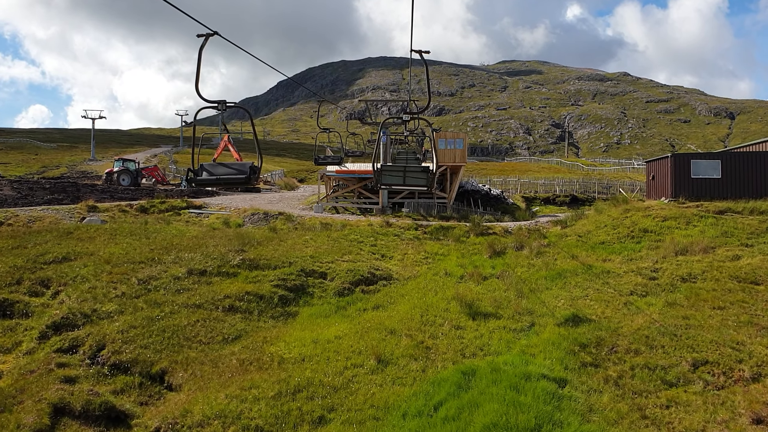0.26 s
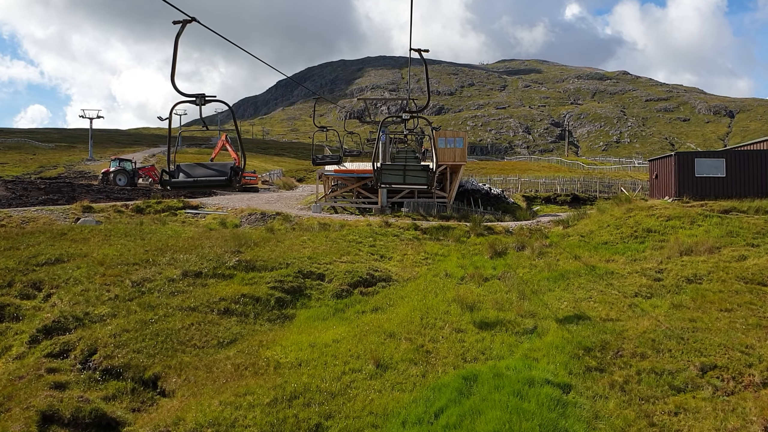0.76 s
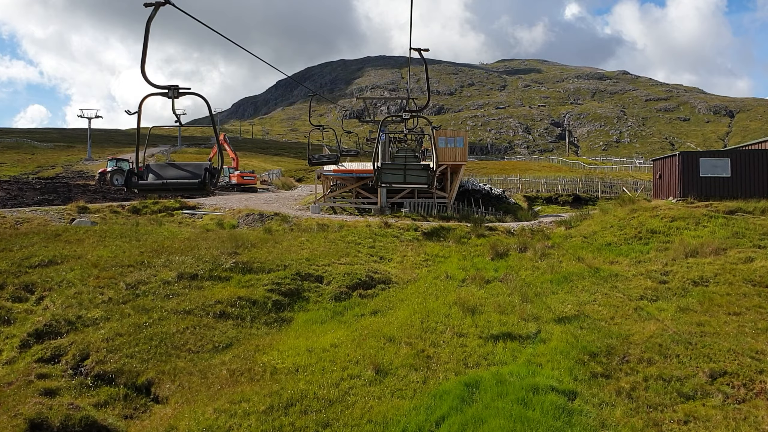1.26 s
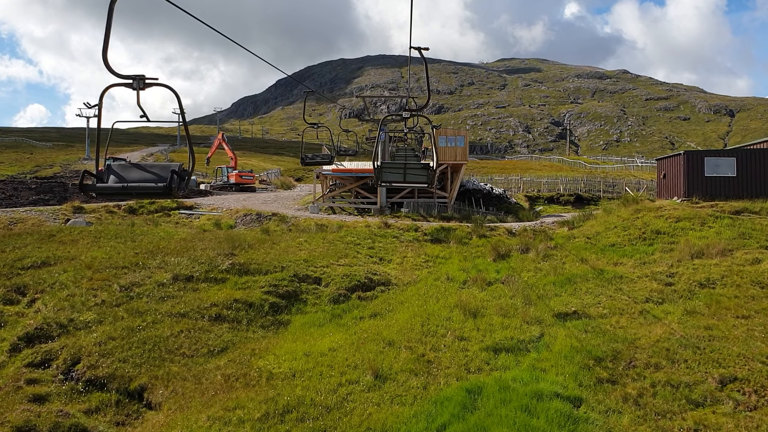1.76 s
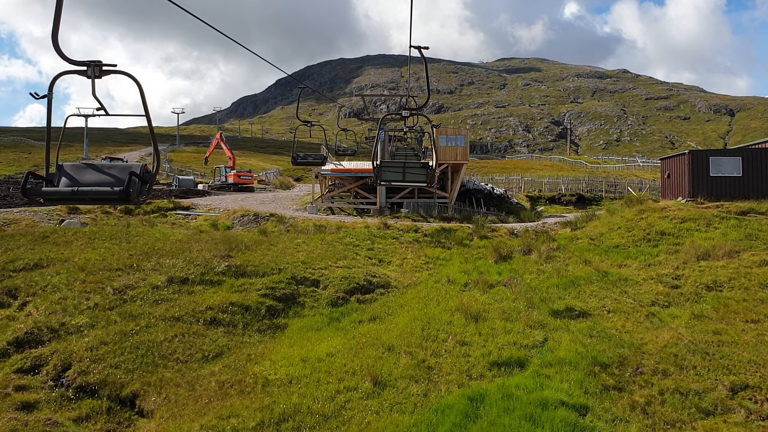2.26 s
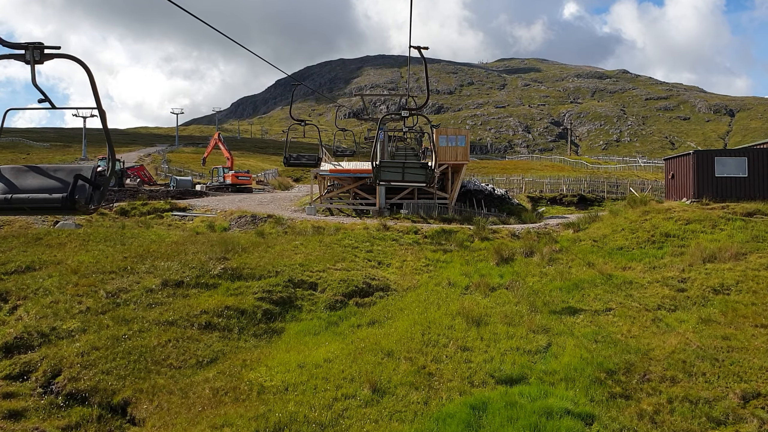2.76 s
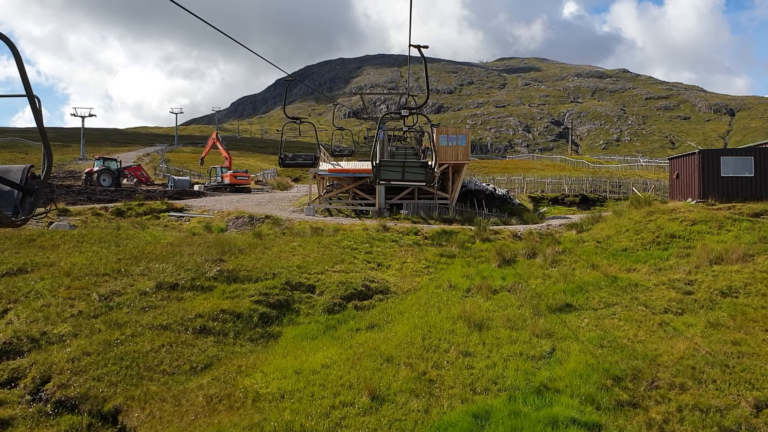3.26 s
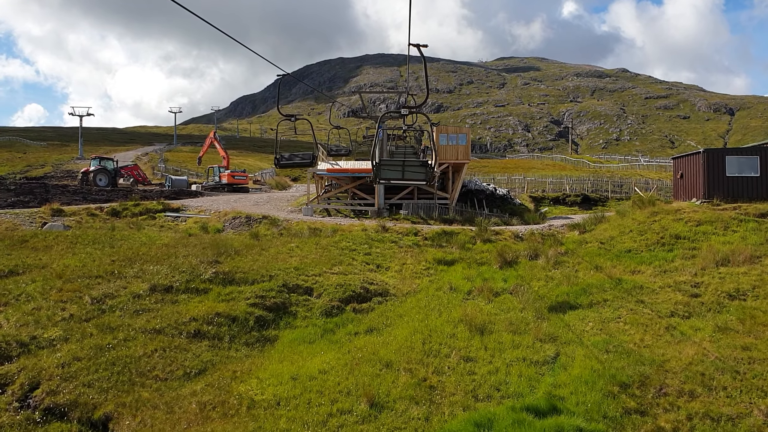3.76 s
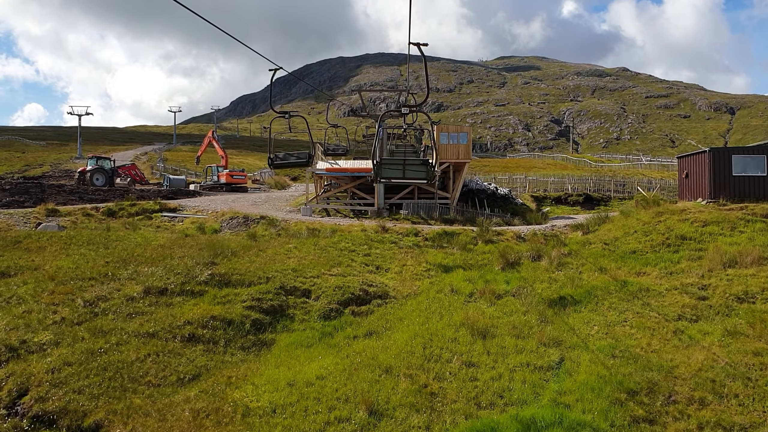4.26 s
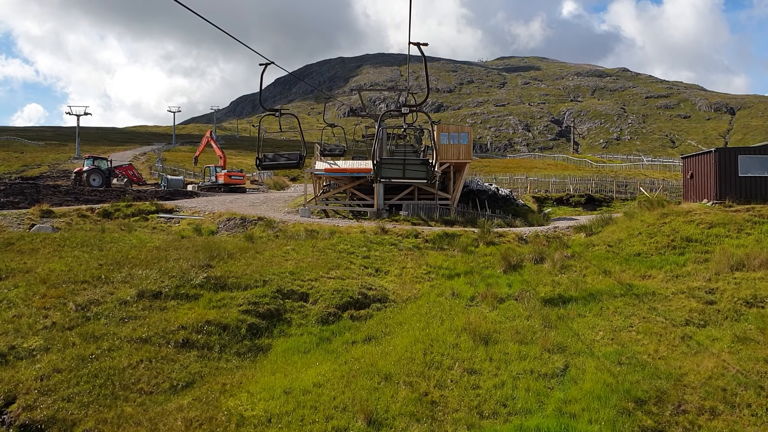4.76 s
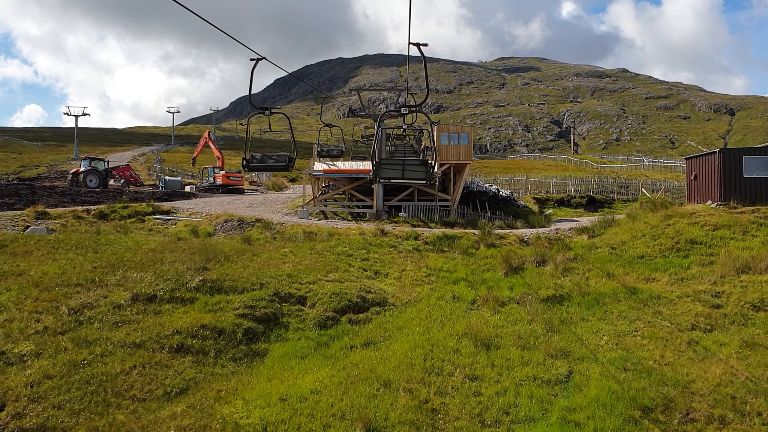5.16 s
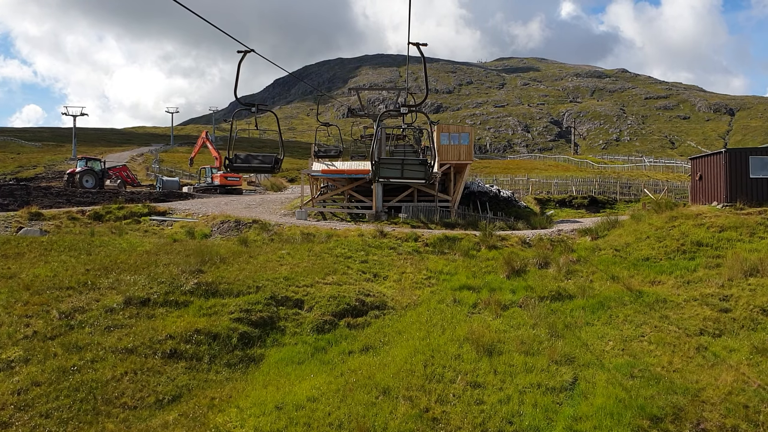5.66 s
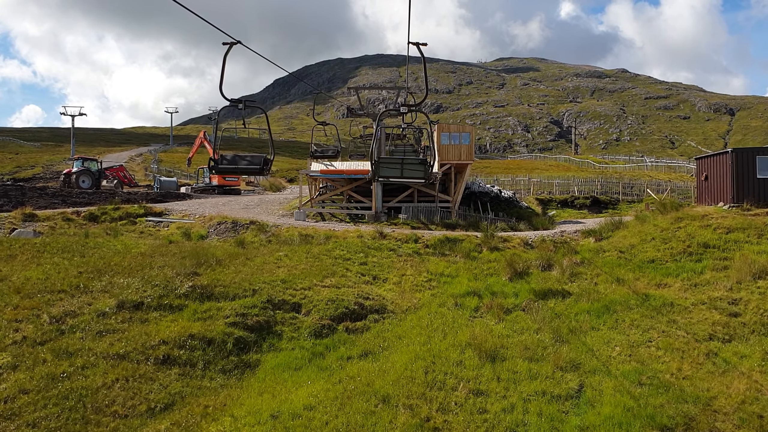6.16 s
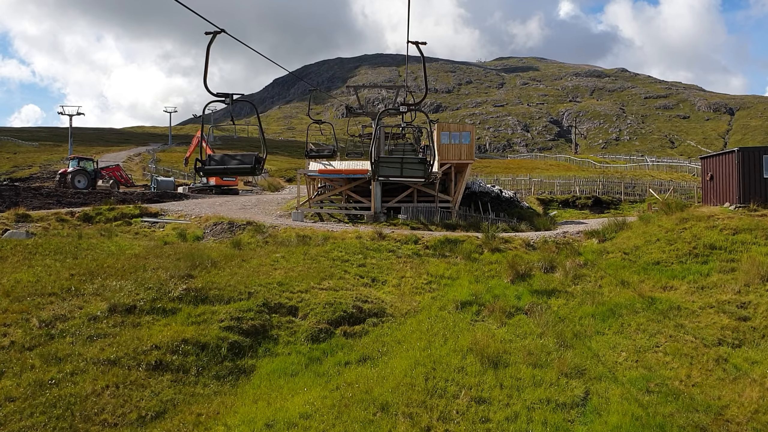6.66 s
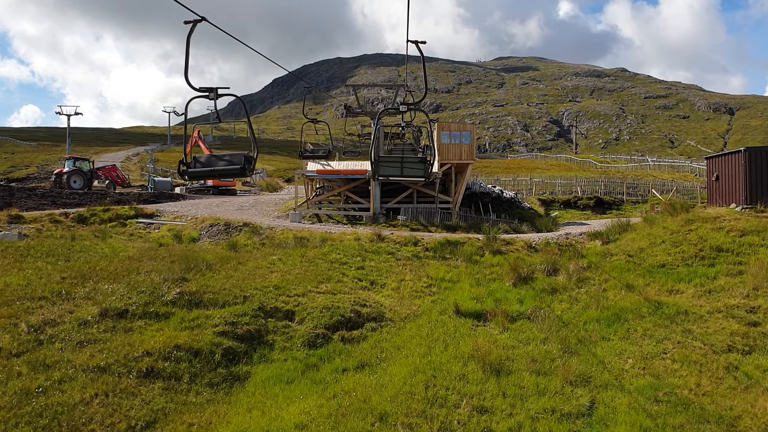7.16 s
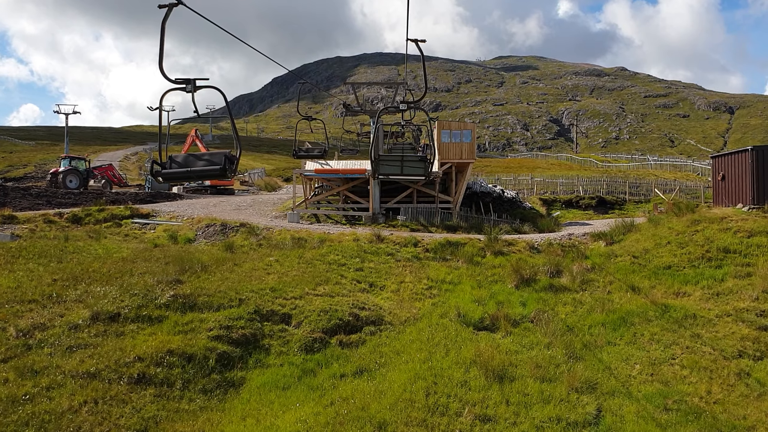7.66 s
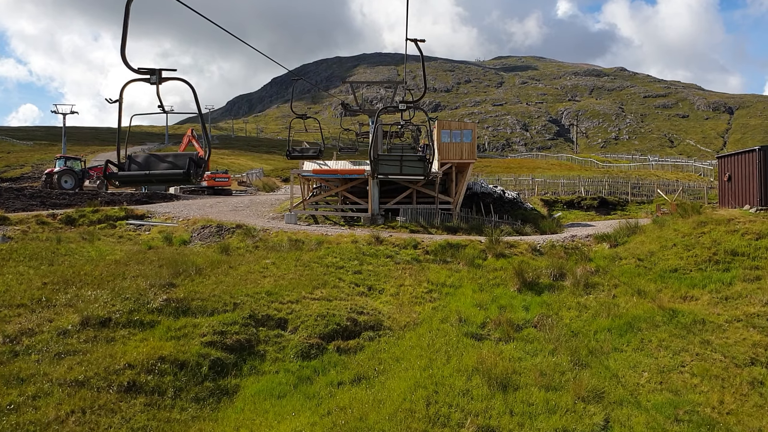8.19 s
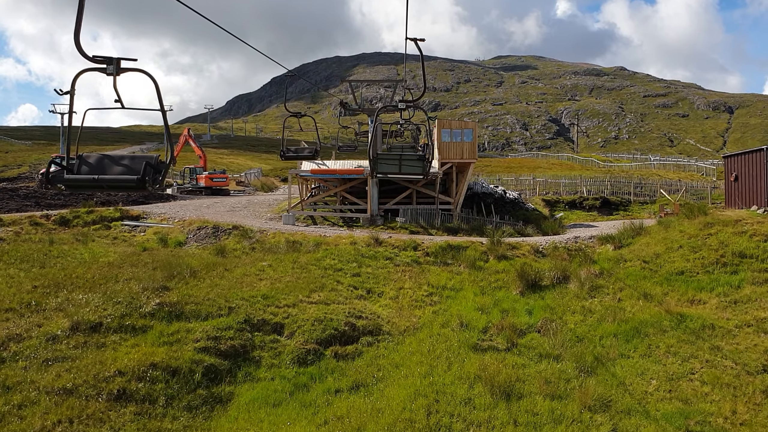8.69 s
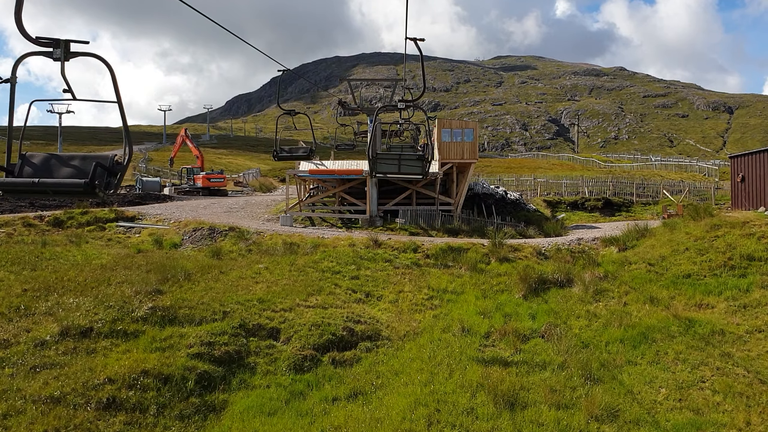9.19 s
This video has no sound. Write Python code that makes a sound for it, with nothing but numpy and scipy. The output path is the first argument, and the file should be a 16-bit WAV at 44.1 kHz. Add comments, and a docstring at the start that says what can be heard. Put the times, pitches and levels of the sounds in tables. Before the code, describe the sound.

Open hillside chairlift: constant throbbing engine hum with a faint whine, bursts of low wind buffeting, an early loose-metal buzz and faint rising hiss at the end.

```python
"""An open hill, from a chair riding down its rope toward a lift station. The station's four-cylinder diesel
(hum lines and pulsing noise) holds its speed but for an early dip and overshoot, over the rope's low sine tones.
Bounces off a surface close by colour both microphone ports. Wind puffs (low chirps) thump mostly the right port,
a far hiss (filtered noise) swells now and then, a loose part rattles briefly on the left (noise bursts into
resonances), a small tick sounds once, and a banded hiss rises at the end."""
import sys
import numpy as np
from scipy import signal
from scipy.fft import rfft, irfft, next_fast_len
from scipy.io import wavfile
from scipy.ndimage import uniform_filter1d, map_coordinates

SR = 44100
rng = np.random.default_rng(int(sys.argv[2]) if len(sys.argv) > 2 else 0)


def int16_out(signal):
    """Quantize to a 16-bit WAV file."""
    q = np.round(np.clip(np.atleast_2d(signal).T, -1, 1) * 32767)
    wavfile.write(sys.argv[1], SR, q.astype(np.int16))


N = 415863

CYCLE_HZ = 15.172  # nominal engine cycles a second: two crank turns, four firings each

# Engine speed: a load comes on, the speed dips, overshoots and settles: (time [s], speed [cycles/s])
ENGINE_SPEED = [(0, 15.172), (1.12, 15.17), (1.42, 15.0), (1.7, 15.14), (1.88, 15.305), (2.2, 15.195),
                (2.5, 15.175), (5.3, 15.163), (7.5, 15.176), (9.43, 15.17)]
# Swells of the two lowest hum orders: (time [s], order 4 gain [dB], order 8 gain [dB])
LOW_ORDER_SWELLS = [(0, -7, -2), (0.8, -3, -1), (2, 0, 1), (4.2, 0, -2), (4.8, 2, -1.5), (6.2, 1.5, 1),
                    (6.8, 0, -1), (7.7, -4.5, -1.5), (8.2, -2.5, -1), (8.8, -4.5, 0.5), (9.43, -2, 2.5)]
# How far the upper hum stands out or sinks: (time [s], gain [dB])
UPPER_HUM_CLARITY = [(0, -0.5), (1.5, -1), (2.7, 5.5), (3.6, 5), (4.8, -1), (5.4, -6), (6.5, -5.5),
                     (7.3, -2), (8.2, -10), (9.43, 5)]
# Slow swells of the engine's upper bands:
# (time [s], left treble [dB], right treble [dB], band near 900 Hz [dB], band near 600 Hz [dB])
AIR_SWELLS = [(0.0, 5.5, 4, 2, 5.5), (0.4, 1.5, 2.5, 2.5, 2), (0.9, 3, 1, -1.5, 5), (1.3, 6.5, 6, -13, 2),
              (2.1, 4.5, 4, -0.5, -0.5), (3.2, 5.5, 4, 0, 0.5), (4.33, 6, 5.5, 0, 3.5),
              (5.0, 3.5, 5.5, 2, 1), (5.4, 2, 3.5, 2, 1.5), (5.91, -0.5, -0.5, 0, 4.5),
              (6.6, -1.5, 0.5, 0, 1.5), (7.27, 3.5, 3.5, -10, 4), (8.03, -2.5, -1, -1, 3.5),
              (8.5, 1, 2.5, -2, 5), (8.9, -1, 2, -1.5, 1.5), (9.43, 3, 4, -5, 3)]


def engine():
    """Hum, roar and singing orders share one engine speed; the upper bands follow the air's swells."""
    cycles = np.cumsum(curves(ENGINE_SPEED)[0]) / SR
    steady = hum(wander=0.15, wander_hz=0.56)
    # Reading the steady hum at the pace of the engine bends its pitch
    read_at = cycles / CYCLE_HZ * SR
    tone = np.array([map_coordinates(port, [read_at], mode="grid-wrap") for port in steady])
    firing_db, second_db = curves(LOW_ORDER_SWELLS)
    tone = swell(tone, firing_db, 30, 88)
    tone = swell(tone, second_db, 92, 150)
    tone = swell(tone, curves(UPPER_HUM_CLARITY)[0], 1160, 20000)

    *treble_db, upper_db, lower_db = curves(AIR_SWELLS)
    noise = amp(-49.5) * roar(2 * np.pi * cycles, throb=0.16, lope=0.15)
    noise = swell(noise, treble_db, 1110, 20000)

    sound = swell(tone + noise, upper_db, 840, 1000)
    sound = swell(sound, lower_db, 490, 740)
    return sound + singing(cycles)


def hum(wander, wander_hz):
    """Steady engine orders; each drifts slowly in strength and phase through the air, high ones most."""
    hz = np.fft.rfftfreq(N, 1 / SR)
    lines = np.zeros((2, len(hz)), complex)
    for order, *db in engine_orders():
        near = np.arange(-40, 41) + round(order * CYCLE_HZ * N / SR)
        skirt = np.exp(-.5 * ((hz[near] - order * CYCLE_HZ) / wander_hz) ** 2)
        depth = wander * (order / 24) ** 0.9
        drift = depth * skirt / np.linalg.norm(skirt) * np.exp(2j * np.pi * rng.random(len(near)))
        drift[40] += np.exp(2j * np.pi * rng.random())  # the steady line in the middle of its skirt
        drift /= np.sqrt(1 + depth ** 2)
        # The levels already hold the bounces' gain, so only their phase is added
        bounce_phase = np.exp(1j * np.angle(ports(hz[near])))
        lines[:, near] += amp(db)[:, None] * drift * bounce_phase
    return irfft(lines, N) * N / np.sqrt(2)


# Strong orders, before swells and body colour: (order [multiple of the cycle], left [dB rms], right [dB rms])
STRONG_ORDERS = [(4, -51.5, -48), (8, -54, -52.5), (10, -70, -69), (11, -74, -71), (14, -61, -58),
                 (16, -72, -71), (18, -71, -69), (20, -68, -65), (21, -70, -66), (23, -77, -73),
                 (24, -66, -60), (25, -77, -69), (26, -80, -71), (28, -81, -69), (48, -75, -75),
                 (50, -75, -76), (51, -73, -75), (52, -72, -74), (53, -74, -75), (56, -77, -76),
                 (62, -85, -76), (64, -87, -77), (67, -90, -76), (68, -87, -76), (76, -83, -75),
                 (96, -85, -96), (102, -84, -91), (104, -86, -88), (111, -98, -80), (115, -95, -81),
                 (117, -94, -82), (121, -91, -83), (124, -86, -86), (164, -91, -89), (166, -94, -90),
                 (170, -97, -88), (173, -101, -87), (175, -100, -86), (360, -98, -93)]
# Mean level of the faint orders, before port colour: (frequency [Hz], level [dB rms])
FAINT_SLOPE = [(440, -93.5), (650, -85), (900, -97), (1150, -87.5), (1400, -106), (1800, -99.5),
               (2200, -101), (2700, -100), (3000, -108)]


def engine_orders():
    """Rows (order, left dB, right dB): the strong orders, and faint ones scattered about a smooth slope."""
    first, last, scatter_db = 29, 196, 4
    order = np.setdiff1d(np.arange(first, last + 1), [row[0] for row in STRONG_ORDERS + SINGING_ORDERS])
    hz = order * CYCLE_HZ
    db = along(FAINT_SLOPE, hz) + scatter_db * rng.standard_normal(len(hz))
    db = db + np.outer([0, 1], along(RIGHT_OVER_LEFT, hz))
    db = db + 20 * np.log10(np.abs(ports(hz)))
    return STRONG_ORDERS + list(zip(order, *db))


# Roar spectrum before the bounces: (frequency [Hz], relative level [dB per Hz])
ROAR_COLOUR = [(22, -41.5), (40, -9), (62, -6.5), (130, -6.5), (250, -6.5), (380, -10.5), (450, -22),
               (620, -23), (715, -20.5), (800, -24.5), (1000, -29.5), (1150, -29.5), (1300, -29),
               (1600, -35), (1800, -35), (2500, -37), (4000, -51.5), (8000, -67), (12000, -95)]
# Right port's extra colour, also used for the faint orders: (frequency [Hz], right over left [dB])
RIGHT_OVER_LEFT = [(60, 5.5), (300, 0), (500, 4.5), (750, 2.5), (1050, 8), (1300, 0.5), (1800, 8),
                   (2600, 0), (5000, -4.5)]
# How alike the roar is at the two ports: (frequency [Hz], likeness [0-1])
ROAR_LIKENESS = [(60, 0.99), (200, 1), (800, 0.68), (2000, 0.23), (5000, 0.75)]


def roar(turn, throb, lope):
    """Exhaust and fan noise, pulsing with each firing (throb) and each crank turn (lope)."""
    beat = 1 + throb * np.cos(4 * turn) + lope * np.cos(2 * turn + 0.89)
    drift = amp(0.75 * wobble(7))
    noise = patchy(pair(ROAR_LIKENESS), depth_db=1.54)

    def colour(hz):
        right_db = np.outer([0, 1], along(RIGHT_OVER_LEFT, hz))
        return amp(along(ROAR_COLOUR, hz) + right_db) * ports(hz)

    return unit(filtered(beat * drift * noise, colour))


# Orders that swell and sink on their own: (order [multiple of the cycle], left over right [dB])
SINGING_ORDERS = [(47, -2), (49, 0), (54, 1), (59, -5), (72, -9), (105, 1), (158, 0), (162, -2), (168, -6)]
# Their levels before a small wobble: (time [s], then right level of each singing order in turn [dB rms])
SINGING_SWELLS = [(0.0, -77, -75, -72, -73, -78, -80, -90, -95, -92),
                  (1.2, -82, -70, -72, -72, -73, -83, -88, -95, -97),
                  (2.2, -78, -72, -70, -71, -72, -82, -91, -87, -89),
                  (2.8, -77, -71, -71, -68, -71, -82, -89, -91, -79),
                  (3.3, -77, -69, -74, -68, -70, -79, -87, -94, -78),
                  (3.75, -77, -70, -73, -67, -71, -75, -81, -82, -76),
                  (4.3, -77, -70, -75, -68, -69, -79, -81, -81, -76),
                  (4.75, -75, -68, -75, -66, -71, -81, -95, -92, -78),
                  (5.15, -75, -68, -75, -68, -73, -85, -97, -94, -79),
                  (5.5, -75, -67, -76, -69, -74, -89, -99, -96, -84),
                  (6.5, -76, -67, -84, -69, -83, -99, -95, -102, -92),
                  (7.5, -75, -67, -84, -70, -87, -95, -91, -96, -88),
                  (8.2, -71, -68, -79, -71, -81, -102, -96, -94, -90),
                  (8.7, -71, -70, -76, -75, -73, -92, -102, -92, -94),
                  (9.43, -74, -68, -69, -75, -72, -93, -97, -95, -87)]


def singing(cycles):
    """A few engine orders stand out of the hum as sines locked to its speed, each swelling on its own."""
    out = np.zeros((2, N))
    for (order, left_db), level_db in zip(SINGING_ORDERS, curves(SINGING_SWELLS)):
        lag = np.angle(ports(np.array([order * CYCLE_HZ])))
        phase = 2 * np.pi * (order * cycles + rng.random()) + lag
        phase = phase + order / 168 * 0.5 * wobble(4)  # high orders waver more
        level = amp(level_db + 1.1 * wobble(4) + [[left_db], [0]])
        out += np.sqrt(2) * level * np.sin(phase)
    return out


# Bounces, left then right port: (round trip [s], share returned, frequency above which it fades [Hz])
BOUNCES = [(0.001246, 0.54, 5400), (0.001128, 0.45, 1500)]


def ports(hz):
    """Sound bounces to and fro between each port and a surface close by; the right port hears later."""
    right_lag_s = .000108
    paths = []
    for trip_s, share, dull_hz in BOUNCES:
        returned = share / (1 + (hz / dull_hz) ** 2)
        paths.append(1 / (1 - returned * np.exp(-2j * np.pi * hz * trip_s)))
    return np.array(paths) * np.exp(-2j * np.pi * hz * np.array([[0], [right_lag_s]]))


# The haul rope's low tones, felt through the chair: (frequency [Hz], relative level [dB])
ROPE_TONES = [(36.3, -1), (40.5, -6), (71.3, -6), (75.8, -4)]
# Swells of all rope tones together: (time [s], level [dB])
ROPE_SWELLS = [(0, -49), (0.5, -58.5), (2.8, -56), (3.4, -63), (5.5, -64.5), (6.1, -71), (6.5, -65),
               (6.9, -55), (7.4, -61), (8.3, -80), (9.43, -71)]


def rope():
    """The rope's low tones are sines unsteady in level and phase, alike at both ports."""
    t = np.arange(N) / SR
    tones = 0
    for hz, db in ROPE_TONES:
        level = amp(db + 3.0 * wobble(2.5))
        phase = 2 * np.pi * (hz * t + rng.random()) + 0.99 * wobble(1.484)
        tones = tones + level * np.sin(phase)
    return np.sqrt(2) * amp(curves(ROPE_SWELLS)[0]) * tones


# Wind level on the ports: (time [s], left [dB], right [dB])
GUSTS = [(0, -51, -47.5), (0.3, -53, -48), (0.6, -64, -50), (1.0, -64, -42.5), (1.5, -64, -39.5),
         (2.0, -58, -47), (2.7, -50, -44.5), (3.05, -54, -47.5), (4.0, -58, -50), (4.3, -64, -54),
         (4.6, -58, -47), (4.9, -70, -50), (5.4, -59, -53), (5.9, -64, -63), (6.5, -72, -62),
         (6.9, -56, -43), (7.25, -50, -70), (7.6, -67, -46), (8.0, -59, -54), (8.25, -61, -43),
         (8.42, -59, -48), (8.6, -68, -59), (9.43, -54, -50)]
# Buffeting spectrum: (frequency [Hz], relative level [dB per Hz])
BUFFET_COLOUR = [(20, -17), (30, 1.5), (38, 12), (50, -3), (72, 0.5), (120, -5), (250, -19.5), (500, -33.5),
                 (1500, -120)]
# Single puffs, left port's list then right's:
# (centre [s], peak [dB], pitch at the centre [Hz], width scale [ms], sharp edge [dB])
WIND_PUFFS = [
    [(0.135, -29, 82.6, 12, -46), (2.015, -33.5, 63, 49, -52), (3.022, -34, 87.4, 9.4, -54),
     (3.596, -29, 61, 8.5, -57), (7.161, -33, 61, 11, -50), (7.86, -37, 54.4, 16, -54)],
    [(0.16, -31, 72.5, 13, -44), (0.808, -32.5, 93, 16, -40), (1.162, -27, 85.6, 12, -49),
     (1.207, -23, 136.9, 4.5, -40), (1.243, -27, 96.3, 7.7, -40), (1.27, -27.5, 69, 25, -42),
     (1.372, -31, 63.4, 14, -52), (1.456, -24.5, 62.3, 18, -50), (1.479, -23.5, 66.7, 14, -47),
     (1.515, -27.5, 76.6, 16, -35), (1.544, -21, 111.2, 4.4, -48), (1.584, -23.5, 101, 4.4, -48),
     (1.653, -27.5, 79.2, 7.7, -47), (1.739, -18, 105.6, 6.7, -33.5), (1.8, -29.5, 70, 29, -44),
     (1.885, -18, 94.3, 3.8, -32), (1.899, -22, 65.8, 27, -40), (1.917, -28.5, 62.2, 22, -39),
     (1.963, -21.5, 185, 3.8, -33), (1.99, -30, 60, 18, -53), (2.05, -32, 71, 13, -55),
     (2.151, -28.5, 70.7, 22, -56), (2.19, -26, 72.7, 15, -55), (2.217, -22, 121.8, 4.5, -44),
     (2.236, -22, 113.1, 9.6, -42), (2.251, -29, 67, 5.6, -47), (2.305, -23.5, 72, 7.8, -45),
     (2.502, -25, 67.4, 6.5, -54), (2.529, -13.5, 82.4, 13, -26), (2.56, -18, 95.3, 4.7, -34),
     (2.577, -20.5, 82.2, 7.1, -42), (2.628, -29, 72, 9, -57), (2.652, -29, 71.4, 12, -55),
     (2.69, -19, 63.3, 12.5, -45), (2.785, -19.5, 157.7, 3.8, -40), (2.828, -34, 71, 9.8, -55),
     (2.872, -25, 150, 4.4, -35.5), (2.884, -24.5, 79.6, 18, -50), (2.916, -26, 78.7, 5.2, -57),
     (2.96, -31, 72, 6.8, -55), (2.992, -35, 72, 9, -55), (3.915, -32, 74.7, 14, -55),
     (3.98, -29, 151.5, 5.5, -48), (3.992, -21, 67.5, 20, -37), (4.027, -35, 93.2, 20, -55),
     (4.475, -35, 74, 9.3, -51), (4.643, -32, 64, 9.3, -55), (4.859, -27.5, 68, 14, -68),
     (4.9, -29, 110, 4.9, -52), (4.943, -35, 62, 9.6, -58), (6.845, -33, 67, 26, -62),
     (6.905, -32.5, 67.7, 16, -45), (7.512, -27.5, 79.3, 22, -40), (7.678, -24.5, 97.5, 8.2, -56),
     (7.76, -32.5, 75.2, 18, -53), (8.177, -23.5, 101.6, 4.5, -59), (8.218, -26.5, 71.6, 14, -45),
     (8.3, -32, 64.7, 18, -47), (8.321, -30, 69.4, 8.3, -52), (8.41, -31.5, 88.7, 7.9, -50)],
]


def wind():
    """Lumpy noise buffets each port on its own, with short falling puffs, some with a sharp edge."""
    lumps = amp(3.5 * np.array([wobble(34), wobble(18)]))
    buffet = filtered(lumps * rng.standard_normal((2, N)), lambda hz: amp(along(BUFFET_COLOUR, hz)))
    out = amp(curves(GUSTS)) * unit(buffet)

    t = np.arange(-3000, 3000) / SR
    # The eddy slows as it leaves: pitch starts up to half above its centre value and sinks a little below
    glide = 1 + 0.502 * np.tanh(-t / 0.0076) * np.where(t < 0, 1, .3)
    for port, puffs in enumerate(WIND_PUFFS):
        for s, db, hz, ms, edge_db in puffs:
            u = t / (ms / 1000)
            shape = np.exp(-.5 * (u / np.where(u < 0, .3, .7)) ** 2)  # quick rise, slower fall
            swing = 2 * np.pi * hz * np.cumsum(glide) / SR
            puff = amp(db) * shape * np.cos(swing + 2 * np.pi * rng.random())
            # A blunt edge with a finer snap on it, just ahead of the centre: (width s, relative dB)
            for width_s, snap_db in (0.0012, 0), (0.00067, -5):
                v = (t + 0.00342) / width_s
                puff += amp(edge_db + snap_db) * (1 - v * v) * np.exp(-.5 * v * v)
            out[port, round((s + t[0]) * SR):][:len(t)] += puff
    return out


# Contacts of the loose part: (time [s], force on lower ring [dB], force on upper ring [dB])
RATTLE_CONTACTS = [(.0425, -61, -66), (.0682, -53, -57), (.0962, -51, -53), (.1245, -46, -50),
                   (0.153, -47, -48), (.1808, -51, -50), (.209, -56, -55), (.2345, -57, -55),
                   (.2613, -56, -56), (.2885, -56, -56), (.3177, -58, -59)]
# Thin metal resonances, lower group then upper: (frequency [Hz], width [Hz], level [dB])
RATTLE_MODES = [
    [(4250, 270, -4), (4800, 250, -2), (5750, 190, -2), (6500, 450, -6), (7800, 600, -10), (9000, 400, -9)],
    [(11500, 350, -5), (12300, 380, -9), (12800, 500, -5), (14300, 900, -15)],
]


def rattle():
    """A loose part buzzes on its seat: short noisy contacts ring two groups of thin metal resonances."""
    attack_s, t60_s = 0.0016, np.array([[0.058], [0.11]])  # each contact; lower, upper ring
    left_over_right_db = 14
    force, t = np.zeros((2, N)), np.arange(4000) / SR
    envelope = (1 - np.exp(-t / attack_s)) * amp(-60 * t / t60_s)
    for s, *db in RATTLE_CONTACTS:
        touch = envelope * amp(db)[:, None] * rng.standard_normal((2, len(t)))
        force[:, round(s * SR):][:, :len(t)] += touch
    ring = filtered(force, lambda hz: np.array([resonances(group)(hz) for group in RATTLE_MODES])).sum(0)
    return amp(np.array([[.5], [-.5]]) * left_over_right_db) * ring


# The tick: (time [s], level before its attack and decay [dB], frequency [Hz])
METAL_TICK = (.4614, -59, 4800)


def tick():
    """One small metallic tick, a sine dying 60 dB in 6 ms, alike at both ports."""
    s, db, hz = METAL_TICK
    t = np.maximum(np.arange(N) / SR - s, 0)
    envelope = amp(db - 60 * t / .006) * (1 - np.exp(-t / .0002))
    return envelope * np.sin(2 * np.pi * hz * t)


# Swells of the broad hiss: (time [s], level [dB], left over right [dB])
BROAD_SWELLS = [(0.0, -69, -2), (0.2, -67.5, -3), (0.52, -74.5, -4), (1.02, -73.5, -10), (1.3, -72, -10.5),
                (1.7, -71, -8), (2.6, -73, -9.5), (3.1, -69.5, -5.5), (3.6, -68.5, -8), (4.4, -78.5, -6),
                (4.85, -75, -7.5), (6.0, -75.5, -9.5), (7.46, -73.5, -7.5), (8.6, -76, -12.5),
                (9.43, -66, -6)]
# Swells of the narrow airy band, before its wobble: (time [s], level [dB], left over right [dB])
AIRY_SWELLS = [(0, -77, -6), (0.4, -85, -12), (1.1, -88, -8), (1.3, -82, -12), (1.9, -81, -8),
               (2.36, -83, -8), (2.94, -73.5, -1), (3.25, -72, -0.5), (3.86, -88, -4), (4.81, -80, -2),
               (5.4, -98, -6), (5.95, -84, -8), (6.6, -93, -4), (8.7, -99, 7), (9.22, -74, 0),
               (9.43, -76, 2)]
# Broad hiss spectrum at each port before the bounces: (frequency [Hz], relative level [dB per Hz])
BROAD_LEFT = [(1000, -26), (2000, -21), (3000, 2), (4000, -0.5), (5200, 2), (7600, -1), (8300, -12),
              (11000, -27)]
BROAD_RIGHT = [(1000, -33), (2000, -6.5), (2700, 5), (3900, -1), (4500, -4), (6800, -7), (7500, -11),
               (11000, -38)]
# Airy band's spectrum before the bounces: (frequency [Hz], relative level [dB per Hz])
AIRY_COLOUR = [(5000, -44), (5900, -9), (6500, -3), (7000, -6.5), (7800, -26)]


def hiss():
    """Far filtered noise swells and shifts from side to side; a narrow airy band swells on its own."""
    broad_db, broad_pan = curves(BROAD_SWELLS)
    airy_db, airy_pan = curves(AIRY_SWELLS)
    sides = np.array([[.5], [-.5]])

    broad_noise = patchy(pair([(2500, 0.33), (4500, 0.38), (7000, 0.18)]), depth_db=2.5)
    broad_colour = lambda hz: amp([along(BROAD_LEFT, hz), along(BROAD_RIGHT, hz)]) * ports(hz)
    broad = amp(broad_db + sides * broad_pan) * unit(filtered(broad_noise, broad_colour))

    airy = unit(filtered(pair([(6500, 0.17)]), lambda hz: amp(along(AIRY_COLOUR, hz)) * ports(hz)))
    return broad + amp(airy_db + 0.58 * wobble(3.36) + sides * airy_pan) * airy


# Level of the closing hiss before the port offsets: (time [s], level [dB])
RISING_LEVEL = [(8.3, -100), (8.65, -77), (8.95, -69), (9.2, -69), (9.43, -72)]
# Its bands: (frequency [Hz], width [Hz], level [dB])
RISING_BANDS = [(1800, 250, -3.5), (2630, 210, 4), (3500, 260, -6), (4340, 170, -0.5), (4550, 220, -4),
                (5350, 300, -6), (6200, 590, -9)]


def rising_hiss():
    """Noise through a few resonant bands rises at the end, mostly on the right."""
    bands = unit(filtered(pair([(3000, 0.23)]), resonances(RISING_BANDS)))
    return amp(curves(RISING_LEVEL)[0] + np.array([[-7], [1.5]])) * bands


def patchy(x, depth_db):
    """Random patches of gain above the bass, a few hundred Hz by a tenth of a second, alike at both ports."""
    hz, _, z = signal.stft(x, SR, nperseg=1024)
    field = uniform_filter1d(rng.standard_normal(z.shape[1:]), size=5, axis=0)
    field = uniform_filter1d(field, size=10, axis=1)
    above_bass = 1 / (1 + (450 / (hz[:, None] + 1)) ** 4)
    return signal.istft(z * amp(depth_db * above_bass * unit(field)), nperseg=1024)[1][:, :N]


def pair(alike):
    """Two white noises whose likeness follows (Hz, 0-1) points, mixed from a shared and an opposed noise."""
    turn = lambda hz: np.arccos(np.clip(along(alike, hz), 0, 1)) / 2
    shares = lambda hz: np.array([np.cos(turn(hz)), np.sin(turn(hz))])
    mid, side = filtered(rng.standard_normal((2, N)), shares)
    return np.array([mid + side, mid - side])


def swell(x, db, lo_hz, hi_hz):
    """Change the level of one soft-edged band of x by db over time."""
    band = filtered(x, lambda hz: 1 / (1 + (lo_hz / (hz + 1)) ** 4) / (1 + (hz / hi_hz) ** 4))
    return x + (amp(db) - 1) * band


def resonances(modes):
    """The response of (Hz, width Hz, dB) modes side by side, in alternating sign."""
    def response(f):
        total = 0
        for k, (centre, width, db) in enumerate(modes):
            damping = 1j * f * width
            total = total + (-1) ** k * amp(db) * damping / (centre * centre - f * f + damping)
        return total
    return response


def filtered(x, response):
    """x times a complex response of frequency; the ends are mirrored so that they do not click."""
    edge = SR // 8
    x = np.pad(x, [(0, 0)] * (x.ndim - 1) + [(edge, edge)], mode="reflect")
    m = next_fast_len(N + 3 * edge)
    return irfft(rfft(x, m) * response(np.fft.rfftfreq(m, 1 / SR)), m)[..., edge:edge + N]


def wobble(rate):
    """A smooth random curve, rate knots a second."""
    step = np.arange(0, N + 64, 64)
    knots = rng.standard_normal(int(N * rate / SR) + 4)
    return np.interp(np.arange(N), step, map_coordinates(knots, [step * rate / SR]))


def curves(rows):
    """One value per sample for each column after the time."""
    s, *cols = np.transpose(rows)
    return np.array([np.interp(np.arange(N) / SR, s, c) for c in cols])


def along(points, hz):
    """(Hz, value) points read on a log frequency axis."""
    f, v = np.transpose(points)
    return np.interp(np.log(hz + 1), np.log(f + 1), v)


def amp(db):
    """dB to gain."""
    return 10 ** (np.asarray(db) / 20)


def unit(x):
    """Scale to rms 1."""
    return x / np.sqrt(np.mean(x ** 2) + 1e-20)


def scene():
    """Everything at the two ports, summed."""
    return engine() + rope() + wind() + rattle() + tick() + hiss() + rising_hiss()


# Microphone noise spectrum: (frequency [Hz], relative level [dB per Hz])
MIC_NOISE = [(2000, -20), (7000, -9), (8500, -6), (10000, -3), (11500, 0), (15700, -1)]
# Colour of the body around the microphones, left port then right: (frequency [Hz], gain [dB])
BODY_COLOUR = [
    [(900, 0), (1060, 2), (1200, -3.5), (1360, 0), (1500, 1), (1700, -0.5), (1900, 0), (3600, -1),
     (3950, -3.5), (4300, 2.5), (4900, -0.5), (5300, 3), (5700, -2), (6050, -3.5), (6450, 0), (7000, -0.5),
     (7600, 3.5), (8000, 0)],
    [(1200, 0), (1360, -7), (1500, 2), (1900, -0.5), (2250, -3.5), (2500, 2.5), (2900, 1), (3150, -2.5),
     (3550, 2), (3850, -3), (4100, -3.5), (4350, 3.5), (4800, 1), (6700, 1), (7050, -7), (7500, -6),
     (9000, 1)],
]


def record(dry):
    """The microphones add bright noise, take the body's colour and cut deep bass; nothing sounds above top_hz."""
    bass_cut_hz, top_hz = 27, 15735
    own_noise = filtered(rng.standard_normal((2, N)), lambda hz: amp(along(MIC_NOISE, hz)))

    def response(hz):
        body = amp([along(port, hz) for port in BODY_COLOUR])
        s = 1j * hz / bass_cut_hz
        bass_cut = (s ** 2 / (s ** 2 + 1.285 * s + 1)) ** 2
        return body * bass_cut * (hz < top_hz)

    return filtered(dry + amp(-78.5) * unit(own_noise), response)


dry = scene()
out = record(dry)
int16_out(out)
```